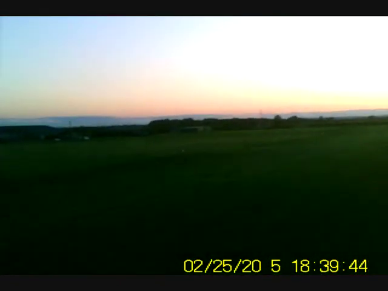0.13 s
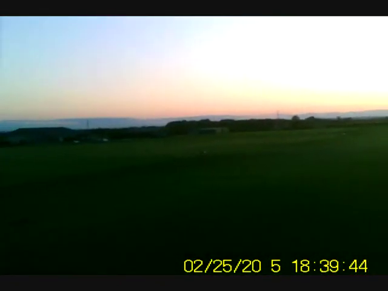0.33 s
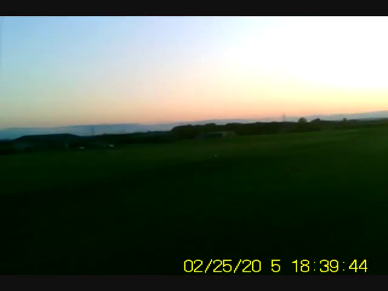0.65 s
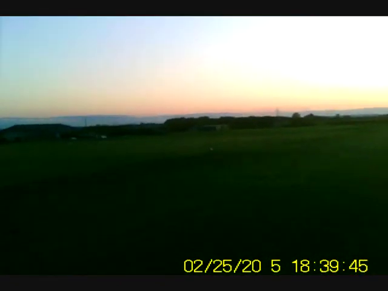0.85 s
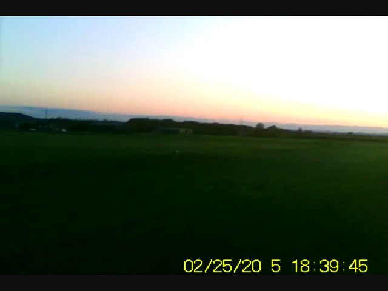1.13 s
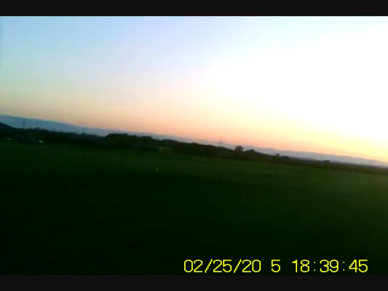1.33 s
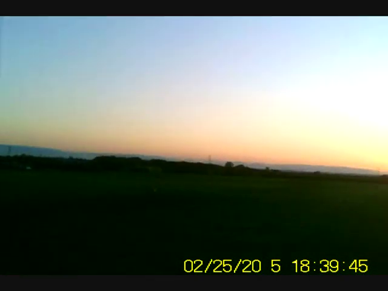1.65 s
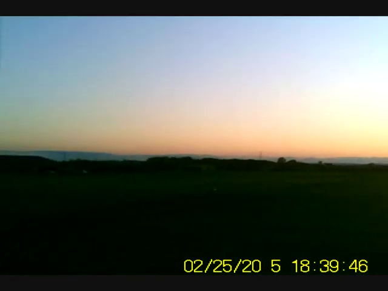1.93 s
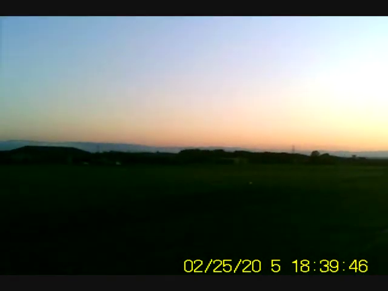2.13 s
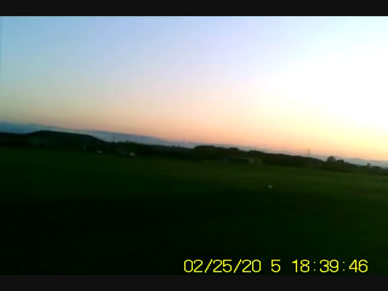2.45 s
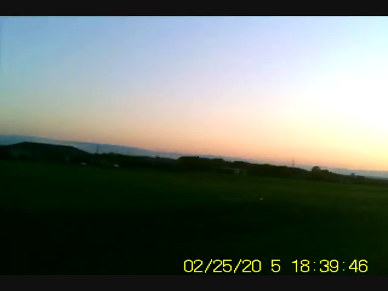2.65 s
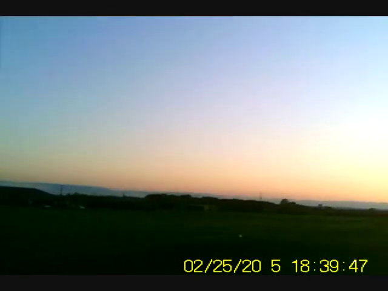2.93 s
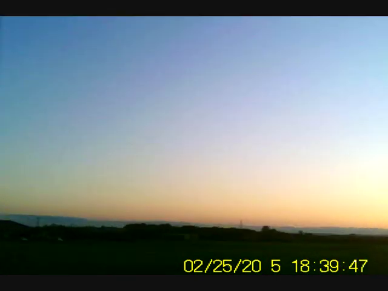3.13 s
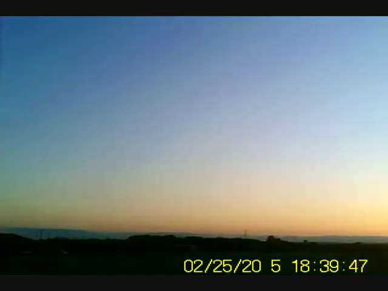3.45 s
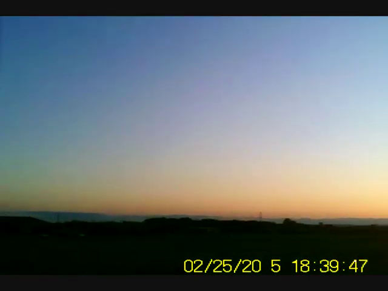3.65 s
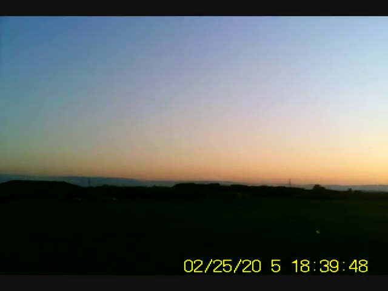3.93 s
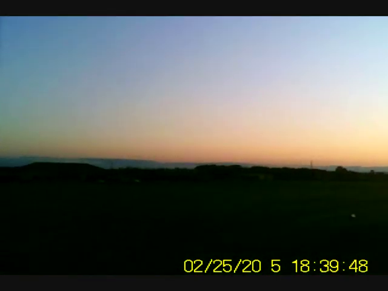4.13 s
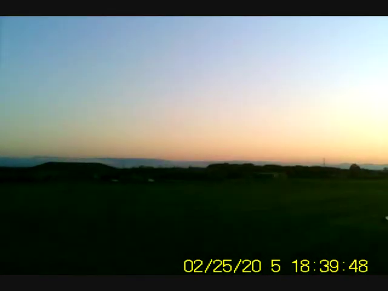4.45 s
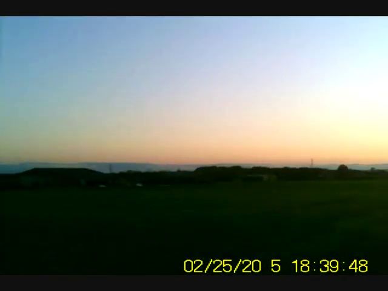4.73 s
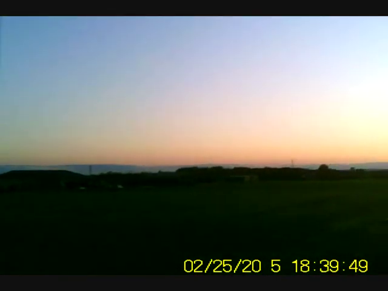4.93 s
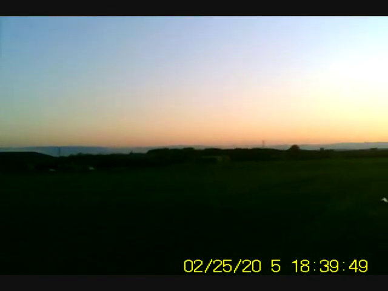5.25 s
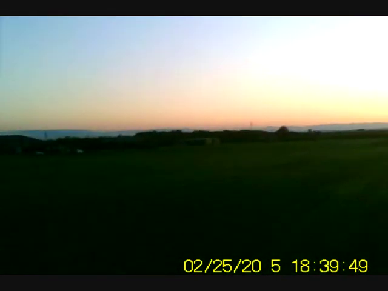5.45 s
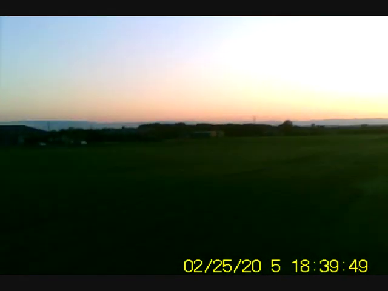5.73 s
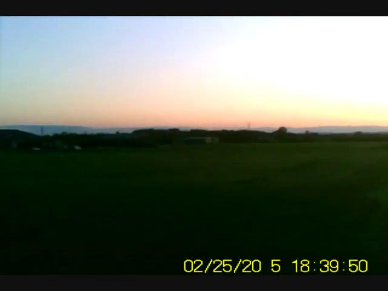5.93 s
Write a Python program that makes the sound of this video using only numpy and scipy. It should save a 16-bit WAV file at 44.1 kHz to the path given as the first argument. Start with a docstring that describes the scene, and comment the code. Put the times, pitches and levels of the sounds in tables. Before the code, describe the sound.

A two-stroke paramotor flies at high power, heard close up from the pilot's seat on a small microphone in the open air. The propeller's rapid slapping blends with the engine into a loud, throbbing drone. The pitch climbs at first, sinks as the throttle eases midway, then rises again near the end. A rushing hiss runs underneath, and low wind buffets the microphone, with two brief gusts early on.

```python
"""A two-stroke paramotor at high power, heard close up from the pilot's seat on a small camera microphone.
Two propeller blades slap past the frame; the geared-up engine fires just below twice their rate,
so the drone throbs. The throttle rises, eases and rises again, and the tone shifts as the pilot's
head tips back. Under the motor the blades swish, a rushing hiss swells with the throttle,
wind buffets the microphone and the camera's electronics whine faintly."""
import sys
import numpy as np
from scipy import signal
from scipy.fft import rfft, irfft
from scipy.io import wavfile
from scipy.ndimage import uniform_filter1d

SR = 44100
rng = np.random.default_rng(int(sys.argv[2]) if len(sys.argv) > 2 else 0)


def log_audio(samples):
    """Write samples as a 16-bit WAV file to the path given in sys.argv[1]."""
    # one column per channel
    frames = np.atleast_2d(samples).T
    # limit to full scale, then quantise
    limited = np.clip(frames, -1, 1)
    pcm = np.round(limited * 32767).astype(np.int16)
    wavfile.write(sys.argv[1], SR, pcm)


N = 269010
T = np.arange(N) / SR

# propeller speed: (time [s], blade rate [Hz])
BLADE_RATE = [(0.0, 74.57), (0.26, 77.85), (0.36, 70.34), (0.6, 75.6), (1.52, 84.48), (1.77, 83.23),
              (2.0, 77.84), (2.28, 75.69), (2.42, 76.97), (2.85, 72.82), (2.95, 66.77), (3.03, 64.5),
              (3.15, 66.61), (3.63, 64.24), (3.85, 68.83), (4.84, 70.38), (5.09, 75.9), (5.31, 76.59),
              (5.71, 74.16), (5.91, 78.32), (6.1, 77.03)]
# reflections off wing, frame and pilot, head tipped back: (centre [Hz], width [Hz], gain [dB])
TIPPED_REFLECTIONS = [(483, 62, -7.5), (659, 110, 5.5), (910, 45, -1)]


def undb(db):
    """Decibels to gain."""
    return 10 ** (np.asarray(db) / 20)


def lookup(table, at=T):
    """Read a two-column table along straight lines, by default over time."""
    return np.interp(at, *np.transpose(table))


def colour(x, spectrum):
    """Filter by a (frequency [Hz], level [dB]) spectrum and scale to rms 1."""
    hz, db = np.transpose(spectrum)
    f = np.maximum(np.arange(N // 2 + 1) * SR / N, 1)
    shaped = irfft(rfft(x) * undb(np.interp(np.log(f), np.log(hz), db)), N)
    return shaped / np.sqrt(np.mean(shaped ** 2))


def peaks_and_notches(x, bands):
    """Filter by fixed bell-shaped bands; partials slide through them as the speed changes."""
    f = np.arange(N // 2 + 1) * SR / N
    gain_db = sum(db * np.exp(-((f - hz) / width) ** 2) for hz, width, db in bands)
    return irfft(rfft(x) * undb(gain_db), N)


def resonance(x, hz, width_hz):
    """One resonance, gain 1 at its centre."""
    return signal.lfilter(*signal.iirpeak(hz, hz / width_hz, fs=SR), x)


def per_cycle(cycles):
    """A new random value for each cycle, joined by straight lines."""
    return np.interp(cycles, np.arange(2048), rng.standard_normal(2048))


def puff(cycles, at, width):
    """A smooth burst once a cycle; place and width in cycles."""
    return np.exp(-(((cycles - at + .5) % 1 - .5) / width) ** 2)


def overspeed(cruise_hz=75):
    """Blade rate above cruise, in Hz."""
    return lookup(BLADE_RATE) - cruise_hz


def effort(spin_up_s=.08, throttle_move_s=.12):
    """The overspeed the engine would settle at, in Hz: the throttle runs ahead of the speed."""
    faster_hz = overspeed()
    hz_per_s = uniform_filter1d(np.gradient(faster_hz) * SR, int(throttle_move_s * SR))
    return faster_hz + spin_up_s * hz_per_s


def head_tilt():
    """How far the pilot's head, and the microphone with it, is tipped back."""
    # head position: (time [s], tilt [0 level .. 1 tipped back])
    tilt = [(2.85, 0.53), (3.15, 1), (3.68, 1), (4.0, 0.29), (4.8, 0.49), (6, 0.56)]
    return np.clip(lookup(tilt), 0, 1)


def camera_whine():
    """Thin steady tones from the electronics beside the microphone."""
    # whine: (frequency [Hz], level [dB rms])
    tones = [(3894, -69), (7402, -79), (7520, -79), (7790, -77), (9600, -82)]
    return sum(np.sqrt(2) * undb(db) * np.sin(2 * np.pi * hz * T) for hz, db in tones)


def hiss_and_buffet(hiss_db_per_hz=.26, buffet_db=-31.5):
    """Rushing hiss that swells with the throttle, plus low wind buffeting on the microphone."""
    # rushing hiss: (frequency [Hz], relative density [dB])
    hiss_spectrum = [(300, 9.5), (2000, 10), (3200, 2.5), (4100, 4), (4900, -4), (6000, 2.5), (7200, -9),
                     (8000, -4.5), (8650, 1), (9300, -7.5), (10200, -13.5), (10800, -26)]
    # gusts on the microphone: (time [s], half length [s], rise [dB])
    gusts = [(.72, .15, 8), (1.006, .09, 11)]
    # rumble at the microphone port: (frequency [Hz], relative density [dB])
    buffet_spectrum = [(4, -16.5), (15, 3.5), (28, -5.5), (55, -4.5), (120, -12.5), (400, -66.0)]
    hiss_db = -45.5 + hiss_db_per_hz * effort()
    hiss_db += 4.8 * head_tilt() ** 2  # louder with the head tipped back
    hiss_db += .7 * per_cycle(6 * T)  # slow unsteadiness
    gust_db = sum(db * np.exp(-((T - s) / length) ** 2) for s, length, db in gusts)
    buffet = undb(buffet_db + gust_db) * colour(rng.standard_normal(N), buffet_spectrum)
    hiss = undb(hiss_db) * colour(rng.standard_normal(N), hiss_spectrum)
    return hiss + buffet


def blade_swish(passes, cruise_db=-25.5, db_per_hz=.1, scatter_db=1.6):
    """Turbulence flares as a blade cuts the wakes of the frame tubes, and at the slap itself."""
    # turbulence shed by the blades: (frequency [Hz], relative density [dB])
    turbulence = [(60, 5.5), (130, 15), (270, 13.5), (420, 8.5), (650, 3.5), (1000, 2), (1500, -4.5),
                  (2000, -4.5), (2500, -8.5), (3100, -19.5), (4500, -30.5), (9000, -45.5)]
    # reflections off the frame, as on the slap, colouring the rush: (centre [Hz], width [Hz], gain [dB])
    frame_reflections = [(1340, 70, -1.5), (1470, 67, 0.5), (1800, 78, 2)]
    at_slap = .55 * puff(passes, at=0, width=.033)
    at_wakes = .41 * puff(passes, at=-.19, width=.05) + .6 * puff(passes, at=-.37, width=.075)
    envelope = 1 + (at_slap + at_wakes) * undb(scatter_db * per_cycle(passes))
    rush = colour(envelope * rng.standard_normal(N), turbulence)
    rush = peaks_and_notches(rush, frame_reflections)
    tipped_share = .26 * head_tilt()
    rush = (1 - tipped_share) * rush + tipped_share * peaks_and_notches(rush, TIPPED_REFLECTIONS)
    return undb(cruise_db + db_per_hz * effort()) * rush


def exhaust(passes, firings_per_pass=25 / 13, jitter_cycles=.002, bark_db_per_hz=.39):
    """Firings drone and bark from the pipe; shaken by the propeller, they also set the cage humming."""
    # tuned pipe, rung by the firing tone and by its octave: (centre [Hz], width [Hz], level [dB])
    pipe_modes = [(149.6, 15, -23), (251.7, 41.6, -25)]
    # upper exhaust partials: (multiple of the firing rate, level [dB])
    bark_partials = [(3, -46), (5, -54.5), (7, -48), (10, -52), (14, -56), (18, -65), (22, -74)]
    # a higher ring of the pipe that colours the bark: (centre [Hz], width [Hz], gain [dB])
    pipe_ring = [(963, 41, 9)]
    firings = firings_per_pass * passes - .13
    angle = 2 * np.pi * (firings + jitter_cycles * per_cycle(firings))
    octave = np.cos(2 * angle)
    drives = np.cos(angle), undb(3.1 * per_cycle(passes / 2)) * octave
    drone = sum(undb(db) * resonance(drive, hz, width)
                for drive, (hz, width, db) in zip(drives, pipe_modes))
    bark = sum(undb(lookup(bark_partials, k)) * np.cos(k * angle + rng.uniform(0, 2 * np.pi))
               for k in range(3, 23))
    bark_db = bark_db_per_hz * effort() + 2 * per_cycle(firings)
    bark = peaks_and_notches(bark * undb(bark_db), pipe_ring)
    shake = .98 * np.cos(2 * np.pi * passes) + .68 * np.cos(np.pi * passes)  # per blade, per shaft turn
    cage_db = -26 + 2 * per_cycle(passes / 2)
    cage = resonance(undb(cage_db) * octave * shake, hz=232, width_hz=50)
    return np.sqrt(2) * (drone + bark + cage)


def blade_slap(passes, jitter_cycles=.001, waver_depth=.15, waver_passes=24, mismatch=.039):
    """Just behind the seat, each blade pushes a broad pressure hump ahead of a sharp suction spike."""
    # one slap at cruise: (multiple of the blade rate, level [dB])
    partials = [(1, -22), (2, -15.5), (3, -15.5), (4, -20.5), (5, -29), (6, -33.5), (8, -38), (10, -40),
                (12, -40.5), (13, -56), (15, -46), (16, -42.5), (18, -49.5), (21, -45.5), (23, -48.5),
                (26, -50.5), (30, -55), (34, -65.5), (42, -70)]
    # swell of the propeller's deepest beat: (time [s], gain [dB])
    bass_swell = [(0, 0), (1.2, -2.5), (1.9, 2.7), (2.7, 1.5), (3.1, -2.5), (3.8, 0.7), (6.1, 2.5)]
    # swell of the midrange, on top of its rise with speed: (time [s], gain [dB])
    mid_swell = [(0, 0), (1.2, -0.5), (1.7, 0.2), (2.1, 0.7), (2.6, -4.5), (3.15, -0.5), (3.9, -0.2),
                 (4.7, -1), (5.9, 1)]
    # reflections off wing, frame and pilot, head level: (centre [Hz], width [Hz], gain [dB])
    level_reflections = [(383, 11, -5), (412, 14, 2), (447, 23, -9.5), (810, 91, 4), (1320, 78, 2.5),
                         (1810, 45, 3), (2300, 99, 1.5)]
    faster_hz, tilt = overspeed(), head_tilt()
    push_hz = np.minimum(faster_hz, 2.7)  # thump and body grow with speed only this far
    angle = 2 * np.pi * (passes + jitter_cycles * per_cycle(passes))
    scatter_db = .59 * per_cycle(passes)
    bass = undb(lookup(bass_swell))
    thump = undb(1 + .42 * push_hz + scatter_db)
    body = undb(-1.16 + .55 * push_hz - 7.5 * tilt ** 2 + scatter_db)  # shaded by the tipped head
    snap = undb(1 + .36 * faster_hz + 1.05 * per_cycle(passes))
    mid = snap * undb(lookup(mid_swell))
    slaps = 0
    for k in range(1, 43):
        gain = bass if k == 1 else thump if k == 2 else body if k < 5 else mid if k <= 14 else snap
        if k >= 5:  # each upper partial swells and fades on its own
            gain = gain * (1 + waver_depth * per_cycle(passes / waver_passes))
        lead = 2.3 * np.exp(-(k / 2.1) ** 2)  # long waves make the hump that runs ahead
        smear = .65 * (k / 20) ** 2 * rng.standard_normal()  # short waves scatter off the frame tubes
        slaps -= gain * undb(lookup(partials, k)) * np.cos(k * angle - lead + smear)
    slaps *= np.sqrt(2) * (1 + mismatch * np.cos(np.pi * passes))  # one blade bites a little harder
    head_level = peaks_and_notches(slaps, level_reflections)
    head_back = peaks_and_notches(slaps, TIPPED_REFLECTIONS)
    return (1 - tilt) * head_level + tilt * head_back


def scene():
    """Mono, from the pilot's seat: one shaft speed sets the pitch of propeller and engine."""
    passes = .577 + np.cumsum(lookup(BLADE_RATE)) / SR  # running count of blade passes
    motor = blade_slap(passes) + exhaust(passes) + blade_swish(passes)
    return (motor + hiss_and_buffet() + camera_whine())[None]


def record(dry, top_hz=10750):
    """The camera clips the tallest spikes, suction first, and cuts the top treble."""
    clipped = np.clip(dry, -.95, 1)
    lowpass = signal.ellip(10, .2, 80, top_hz, fs=SR, output="sos")
    return signal.sosfilt(lowpass, clipped)


dry = scene()
out = record(dry)
log_audio(out)
```